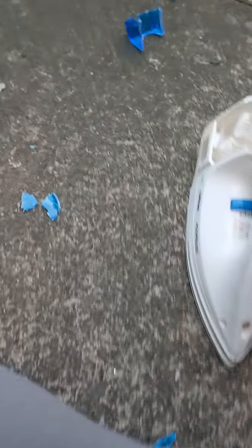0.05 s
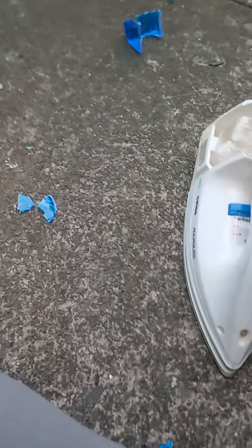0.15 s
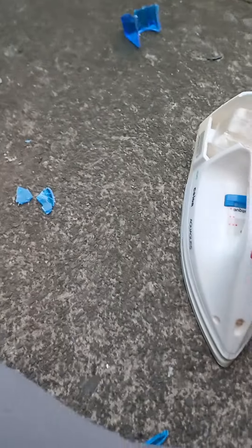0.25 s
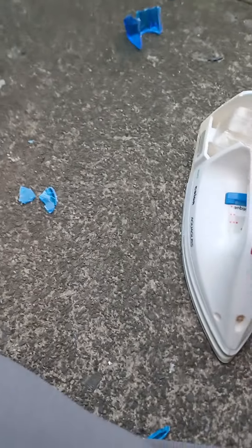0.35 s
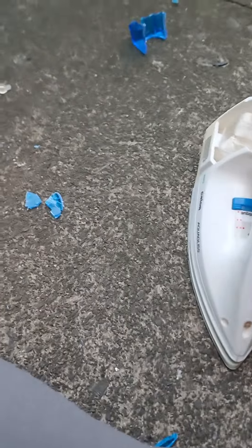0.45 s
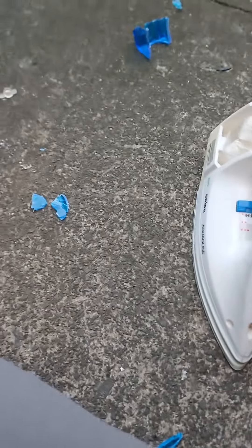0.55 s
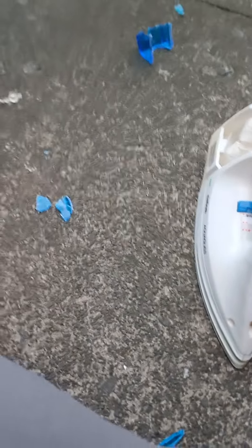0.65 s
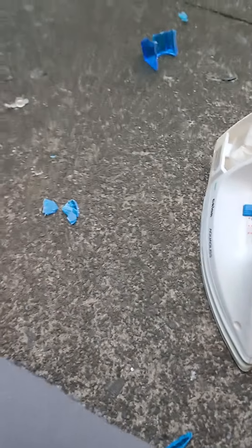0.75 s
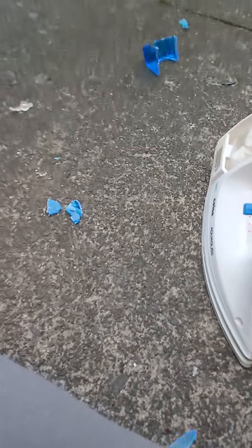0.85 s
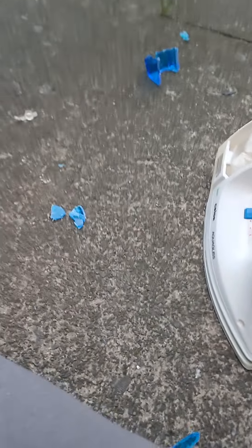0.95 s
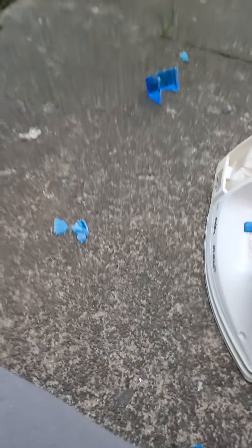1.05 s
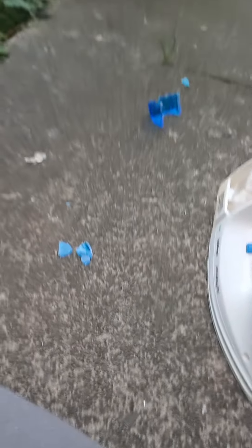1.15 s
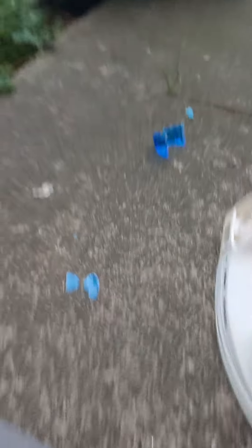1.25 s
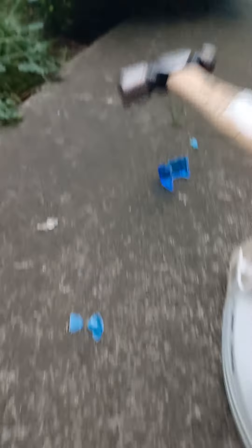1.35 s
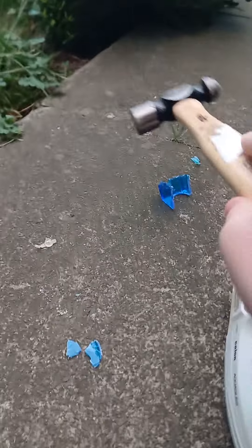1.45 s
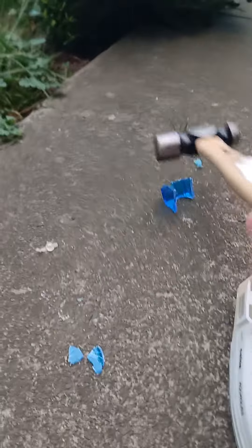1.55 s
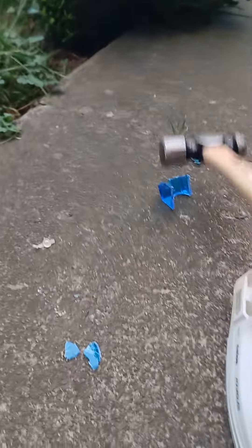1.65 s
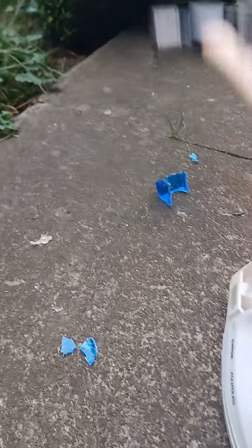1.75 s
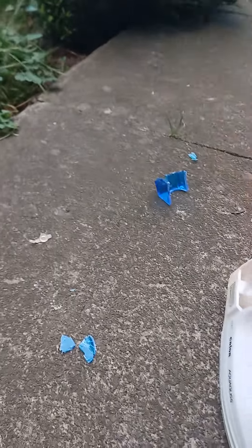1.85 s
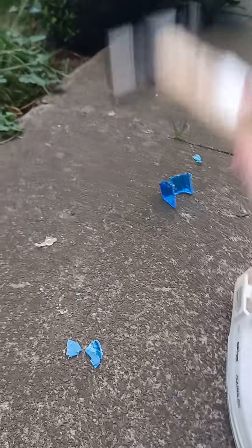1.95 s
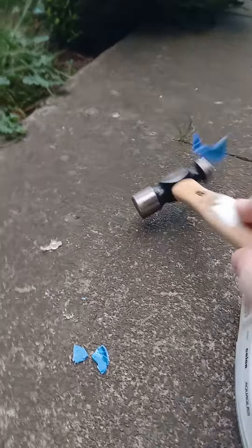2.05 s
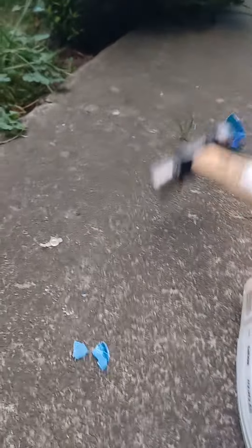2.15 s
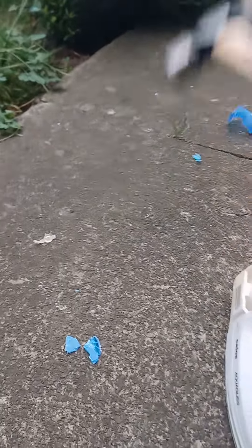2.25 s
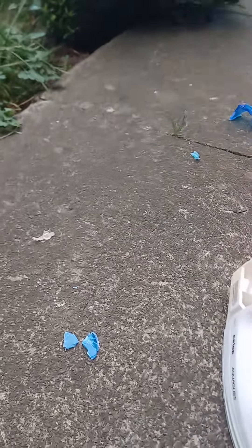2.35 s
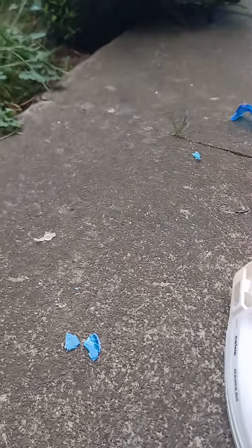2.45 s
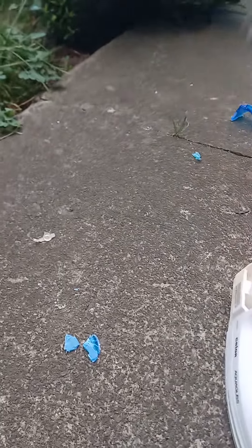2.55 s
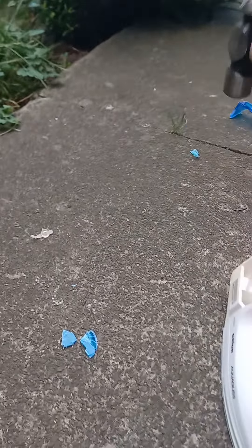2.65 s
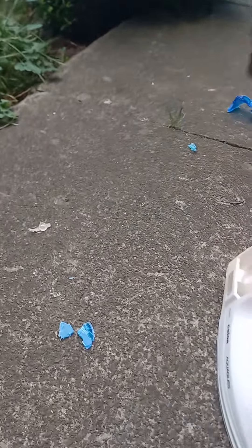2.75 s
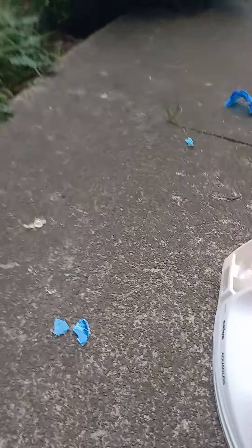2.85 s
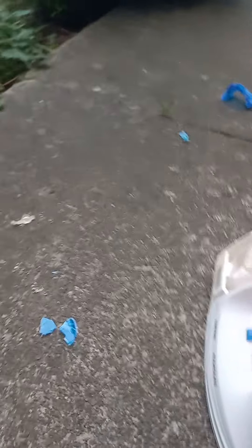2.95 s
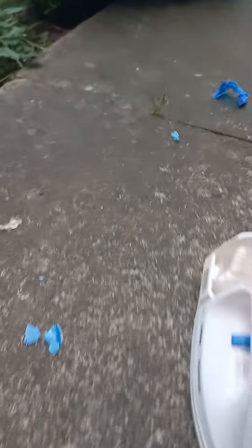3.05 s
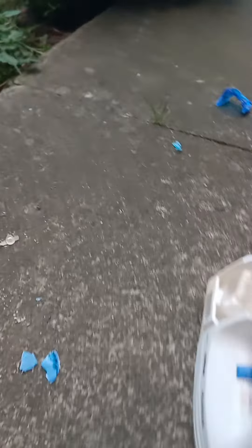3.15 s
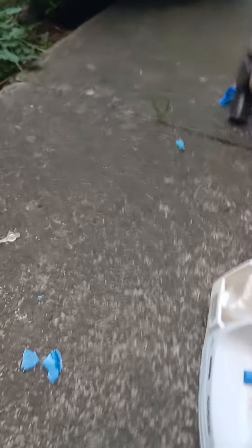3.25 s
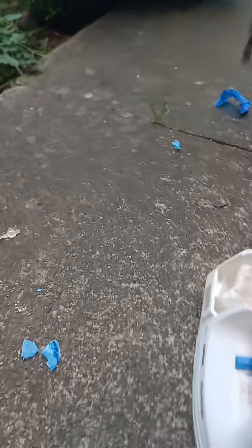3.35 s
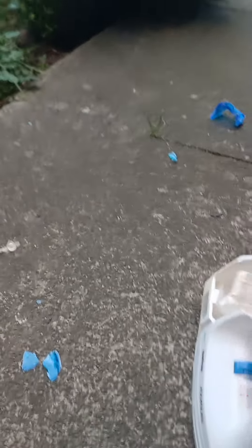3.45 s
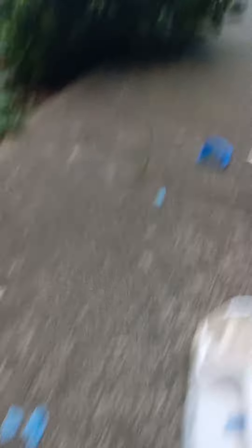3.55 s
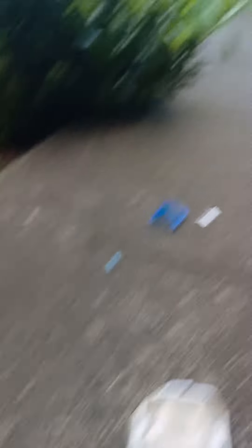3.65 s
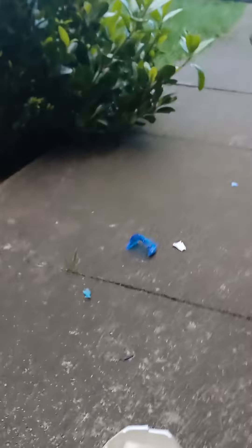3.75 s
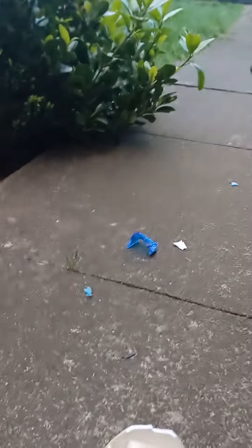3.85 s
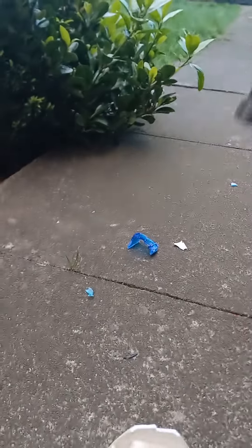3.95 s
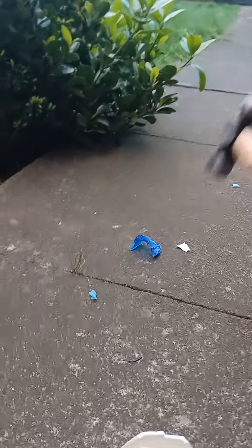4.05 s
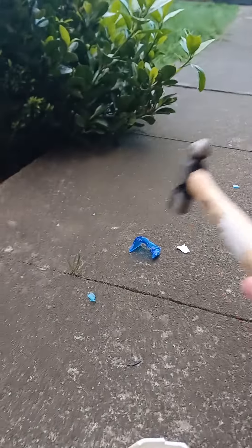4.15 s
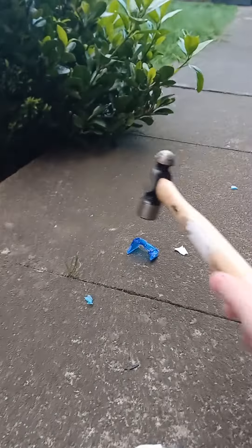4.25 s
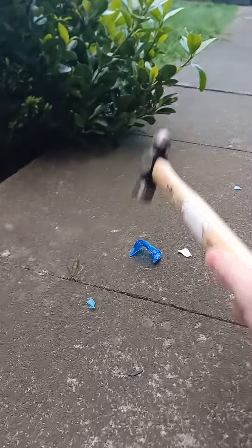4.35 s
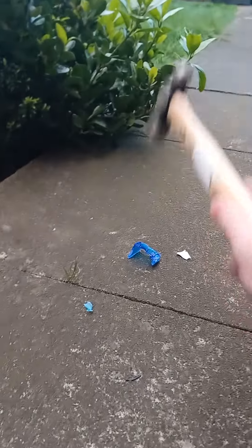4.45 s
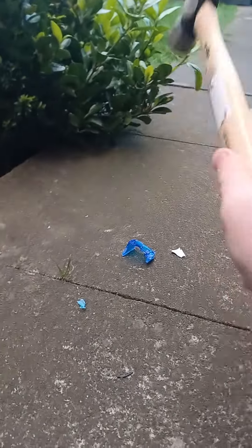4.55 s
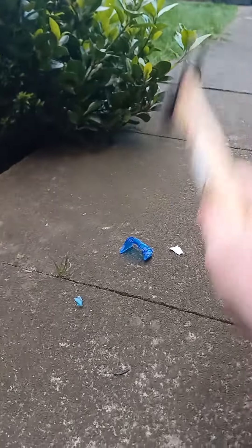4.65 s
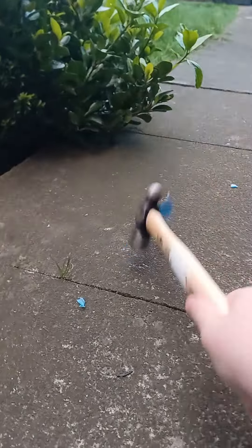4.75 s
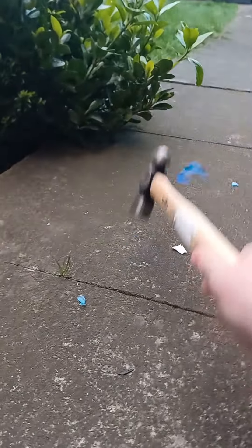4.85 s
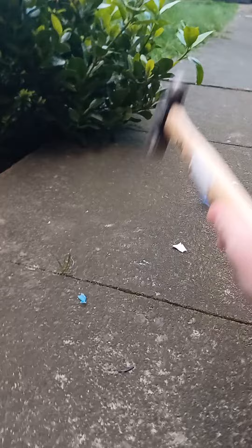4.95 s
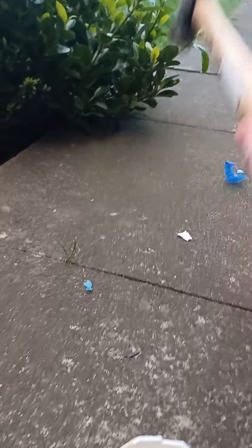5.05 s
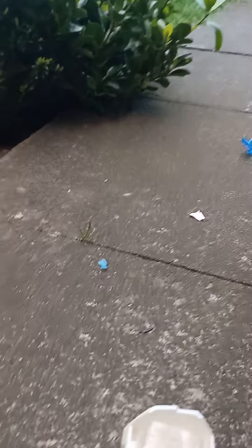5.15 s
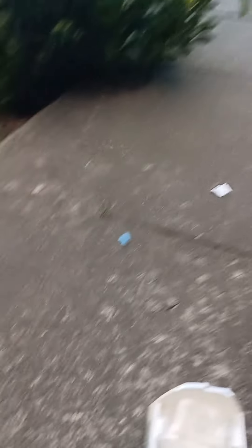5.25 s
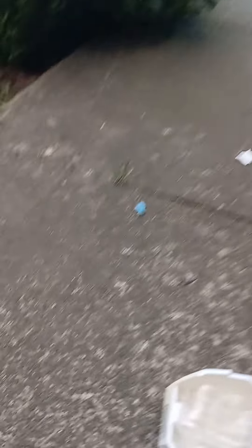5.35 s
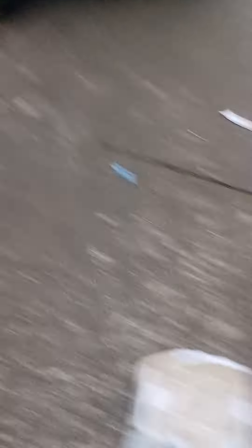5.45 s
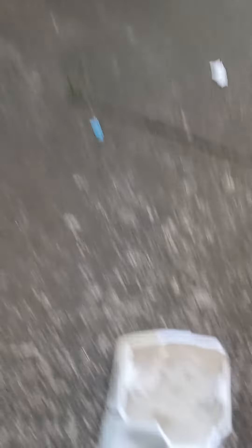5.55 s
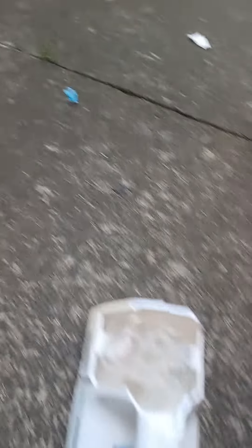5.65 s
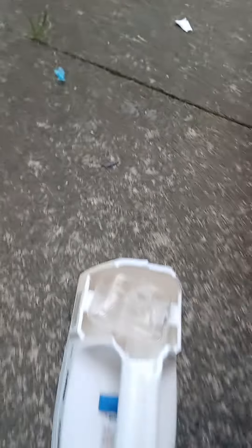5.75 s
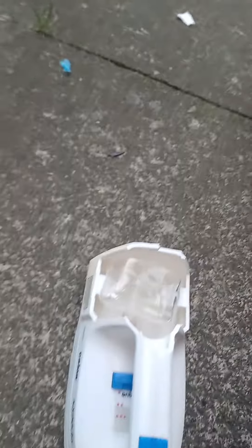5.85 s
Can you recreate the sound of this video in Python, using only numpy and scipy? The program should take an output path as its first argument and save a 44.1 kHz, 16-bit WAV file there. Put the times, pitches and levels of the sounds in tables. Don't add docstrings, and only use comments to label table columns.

```python
import sys
import numpy as np
from scipy import signal
from scipy.fft import rfft, irfft, next_fast_len
from scipy.io import wavfile
from scipy.ndimage import uniform_filter1d

SR = 44100
rng = np.random.default_rng(int(sys.argv[2]) if len(sys.argv) > 2 else 0)


def volts(x):
    e = np.asarray(x, float) / 20
    return 10 ** e


def bounce(signal):
    frames = np.transpose(np.atleast_2d(signal))
    limited = np.clip(frames, -1, 1)
    pcm = np.round(limited * 32767).astype(np.int16)
    wavfile.write(sys.argv[1], SR, pcm)


N = 260190

BASS_PAN_DB = -2.5
PORT_LAG_S = 0.0001922


def colour(x, points):
    hz, db = np.transpose(points)
    size = next_fast_len(x.shape[-1], True)
    f = np.maximum(np.fft.rfftfreq(size, 1 / SR), 1)
    gain = volts(np.interp(np.log(f), np.log(hz), db))
    return irfft(rfft(x, size) * gain, size)[..., :x.shape[-1]]


def unit(x):
    return x / np.sqrt(np.mean(x ** 2))


def curve(rows):
    s, *columns = np.transpose(rows)
    return [np.interp(np.arange(N) / SR, s, c) for c in columns]


def walk(rate, channels=1):
    k = int(SR / rate)
    steps = np.repeat(rng.standard_normal((channels, N // k + 1)), k, axis=1)
    smooth = uniform_filter1d(uniform_filter1d(steps, k), k)
    return unit(smooth[:, :N])


def add(out, x, s):
    i = int(s * SR)
    out[:, i:i + x.shape[1]] += x[:, :out.shape[1] - i]


def pan(db):
    return volts(np.array([[db / 2], [-db / 2]]))


def ring(hz, t60, rise_s, length_s, lag_s):
    t = np.maximum(np.arange(int(length_s * SR)) / SR - np.array([[0], [lag_s]]), 0)
    return -np.sin(2 * np.pi * hz * t) * (1 - np.exp(-t / rise_s)) * volts(-60 * t / t60)


# t/s, level/dB
ROAD = [(0.0, -53), (0.23, -50), (0.52, -56.5), (0.89, -55.5), (1.26, -53), (1.77, -48.5), (2.0, -47),
        (2.41, -48), (3.38, -42), (3.79, -48.5), (4.24, -50), (5.06, -47), (5.44, -48.5), (5.9, -42.5)]
# f/Hz, level/dB per Hz
TOWN = [(15, -54.5), (25, -37), (41, -14.5), (70, -5), (149, -8), (175, -15), (206, -10), (242, -8.5),
        (309, -13.5), (695, -16), (1100, -13.5), (2110, -30), (3340, -59.5), (7310, -63), (16000, -52)]
# t/s, f/Hz, level/dB
DRONE = [(.65, 111, -78), (.8, 110.2, -64), (1.186, 112.4, -48), (1.286, 116.8, -53.5), (1.472, 113.4, -46),
         (1.665, 112.3, -65.5), (1.768, 118.8, -46), (1.95, 113.9, -95)]


def traffic():
    calm_db, rumble_db, wash_db = -48, -47, -57
    wash_swing = 0.92
    busy_db = curve(ROAD)[0] - calm_db
    low_db = rumble_db + busy_db
    high_db = wash_db + wash_swing * busy_db
    out = 0
    for mid_hz in 30 * 2 ** np.arange(0, 9.2, .5):
        noise = rng.standard_normal((3, N))
        own = np.clip((mid_hz / 700) ** 0.77, .15, 1)
        mixed = np.sqrt(1 - own ** 2) * noise[0] + own * noise[1:]
        band = colour(mixed, [(mid_hz / 2, -40), (mid_hz, 0), (mid_hz * 2, -40)])
        drive_db = low_db if mid_hz < 470 else high_db + 4.0
        out = out + volts(drive_db + 0.58 * walk(4.63)) * band
    drone_hz, drone_db = curve(DRONE)
    engine = np.sin(2 * np.pi * np.cumsum(drone_hz) / SR)
    drone = np.sqrt(2) * volts(drone_db + 1.0 * walk(5.9)) * engine
    return pan(BASS_PAN_DB) * (volts(28.5) * colour(out, TOWN) + drone)


# t/s at full level, swell/s, hold/s, level/dB
MOVEMENTS = [(0., .05, .04, -77), (0.165, 0.07, 0.59, -74), (1.298, 0.13, 0.17, -70),
             (2.415, 0.87, 0.026, -78.5), (2.713, 0.17, 0.053, -65.5), (2.893, 0.3, 0.16, -81),
             (3.048, 0.13, 0.044, -68), (3.2, 0.08, .07, -86), (3.524, 0.016, 0.16, -64.5),
             (4.245, .4, 0.12, -84.5), (4.518, 0.27, .01, -79), (5.193, 0.48, 0.02, -72),
             (5.404, .05, 0.098, -77.5), (5.62, 0.33, .3, -75)]
# f/Hz, level/dB per Hz
CLOTH = [(880, -25), (1500, -2.5), (1790, -6.5), (2320, -8), (3480, -12.5), (4640, -11.5), (7100, -18),
         (9100, -27), (11500, -17), (16000, -20)]


def rustle():
    swell_db, settle_db_per_s = 22.5, 174
    t = np.arange(N) / SR
    level = 0
    for s, swell, hold, db in MOVEMENTS:
        before = np.maximum(s - t, 0)
        after = np.maximum(t - s - hold, 0)
        level = level + volts(db - swell_db * before / swell - settle_db_per_s * after)
    hiss = unit(colour(rng.standard_normal((2, N)), CLOTH))
    return level * volts(8.0 + 3.0 * walk(25, channels=2)) * pan(-4.5) * hiss


SPRAY_T60_S = 0.38

# t/s, length/s, level/dB, tilt/dB per octave, crumbs/dB
CRUNCHES = [
    (0.1517, 0.0084, -10.5, 4.5, -13),
    (2.0124, 0.004, -12, 7.5, -27.5),
    (3.264, 0.0044, -16, -6.5, -16),
    (4.7302, .007, -25, -1, -8),
    (5.412, .001, -26, 11, -30),
    (5.693, 0.0053, -11, 5.5, -20),
]


def crunch():
    crumb_db = -21
    ripple_db, clump_db = 3., 2.5
    out, t = np.zeros((2, N)), np.arange(SR // 2) / SR
    for s, length, db, tilt_db, spray_db in CRUNCHES:
        pan_db = max(5 + 1.1 * tilt_db, 0)
        noise = rng.standard_normal((3, len(t)))
        clicks = volts(0.83 * unit(uniform_filter1d(rng.standard_normal(len(t)), size=40)))
        clumps = volts(clump_db * unit(uniform_filter1d(noise[0], size=500)))
        ripple = np.transpose([np.geomspace(1500, 16000, num=110), ripple_db * noise[0, :110]])
        burst = np.minimum(t / .001, 1) * np.exp(-np.maximum(t - length, 0) / .0015)
        dust = volts(spray_db - 60 * t / SPRAY_T60_S) * np.minimum(t / length, 1) * clumps
        tone = [(100, -20), (500, 8.5 - 3.1 * tilt_db), (4000, 3),
                (9000, tilt_db - 5.0), (15000, 2 * tilt_db)]
        crackle = colour(.5 * noise[0] + noise[1:], tone)
        left, right = unit(colour(crackle, ripple)) * (burst + dust) * clicks
        right = colour(right, [(4500, 0.0061), (14000, -2 * pan_db)])
        add(out, volts(db) * np.array([left, right]), s)
        chips = crumbs(count=220, tilt_db=tilt_db)
        add(out, volts(db + spray_db + crumb_db) * pan(pan_db) * chips, s + length)
    return out


def crumbs(count, tilt_db):
    size_spread_db = 2.5
    out = np.zeros((2, SR // 2))
    for when, pitch, size, side in rng.random((count, 4)):
        hz, s = 2500 * 6.2 ** pitch, 0.27 * when ** 1.5
        size_db = -size_spread_db * np.log(1 - size)
        db = tilt_db * np.log2(hz / 4000) + size_db - 60 * s / SPRAY_T60_S
        chip = ring(hz, 0.028, 0.000071, .02, PORT_LAG_S * 2 * side)
        add(out, volts(db) * pan(14. * (side - .5)) * chip, s)
    return out


# t/s, contact/s, right port lag/s, bass left minus right/dB
BLOWS = [
    (0.1522, .0004, .0001, 6.5),
    (2.0142, .0008, .0001, -1.5),
    (3.26495, .00008, .0002, -3.),
    (4.7374, .0002, 0., -3.5),
    (5.6950, .0004, .0003, -2.),
    (5.7305, .0003, .0002, -3.),
]
# f/Hz, level/dB, t60/s
KNOCKS = [
    [(260, -13, 0.014), (430, -20, 0.023), (573, -17.5, .02), (1313, -24, 0.057), (3330, -17.5, 0.037),
     (4720, -25.5, 0.032), (6800, -20.5, 0.06)],
    [(326, -10, 0.025), (437.4, -9, 0.023), (677, -1.5, 0.014), (833, 4.5, 0.0079), (1246, -8, 0.013),
     (1510, -36, 0.0092)],
    [(160, -30, 0.026), (327, -8, 0.021), (820, -18.5, 0.046), (1302, -4.5, 0.026), (2230, -19, 0.015),
     (3280, -3.5, 0.0096), (5153, -14, 0.0066), (10930, -31.5, 0.086), (12800, -41, 0.065)],
    [(164.4, -32, 0.17), (394, -12.5, 0.039), (777, -3.5, 0.011), (1289, -3, 0.013), (1910, -12.5, 0.015),
     (4300, -1.5, 0.0027)],
    [(330, -29, 0.041), (582, -10.5, 0.006), (1420, -10.5, 0.0111)],
    [(407, -19.5, 0.02), (640, -26.5, 0.029), (1590, -25.5, 0.032), (2600, -44.5, 0.0091)],
]
# t/s, f/Hz, level/dB
TAPS = [
    (2.59, 858, -49.5),
    (4.33, 1020, -52),
    (4.39, 587, -51.5),
]
# t/s, level/dB
JOLTS = [
    (0.154, -30.5),
    (2.017, -27.5),
    (4.738, -36),
    (5.696, -34.5),
]


def hammer():
    out = np.zeros((2, N))
    for (s, contact, lag, bass_db), modes in zip(BLOWS, KNOCKS):
        for hz, db, t60 in modes:
            pan_db = bass_db if hz < 2500 else -.8
            add(out, volts(db) * pan(pan_db) * ring(hz, t60, contact, 0.27, lag), s)
    for s, hz, db in TAPS:
        add(out, volts(db) * pan(BASS_PAN_DB) * ring(hz, 0.39, 0.0091, .3, PORT_LAG_S), s)
    for s, db in JOLTS:
        add(out, volts(db) * pan(10.0) * ring(68, 0.21, 0.0066, 0.9, 0.0006), s)
    return out


# t/s, level/dB, top f/Hz
ECHOES = [
    (0.017, -12.5, 6880),
    (.039, -19, 2500),
]
# f/Hz, t60/s, level/dB
YARD = [(150, 0.48, -7.5), (442.2, 0.66, -12), (1000, 0.93, -35.5), (2500, 0.34, -18.5),
        (5960, 0.29, -11.5), (13000, 0.1, -17.5)]


def yard():
    round_trip_s = .01975
    t = np.arange(SR) / SR
    flutter = np.zeros((2, SR))
    rounds = np.arange(1, 40)
    returns = 0.39 ** rounds + volts(-11) * 0.857 ** rounds
    flutter[:, (rounds * round_trip_s * SR).astype(int)] = returns
    out = volts(-7.5) * colour(flutter, [(130, -17.5), (230, 8.5), (450, 2.5), (600, -23.5)])
    for s, db, top_hz in ECHOES:
        rough = rng.standard_normal((2, SR)) * np.exp(-np.abs(t - s) / 0.003)
        out += volts(db - 22.0) * colour(rough, [(200, -6), (800, 0), (top_hz, -4), (2 * top_hz, -20)])
    for hz, t60, db in YARD:
        noise = rng.standard_normal((3, SR))
        share = min(100 / hz, .4)
        mixed = share * noise[0] + np.sqrt(1 - share ** 2) * noise[1:]
        band = colour(mixed, [(hz / 3.9, -30), (hz, 0), (hz * 7.5, -30)])
        fade = np.clip((t - .006) / 0.027, 0, 1) * volts(-60 * t / t60)
        out += volts(db) * band * fade / np.sqrt(np.sum(fade ** 2))
    return out


def landing(s, tick_db, bright_db, until, modes, pan_db):
    tumble_hz, tumble_depth = 29.5, 0.087
    out, t = np.zeros((2, SR // 4)), np.arange(SR // 4) / SR
    for (hz, t60, db), z in zip(modes, rng.standard_normal((len(modes), 5))):
        side = pan(pan_db * min(hz / 10000, 1) + BASS_PAN_DB + 1.88 * z[0])
        depth = min(tumble_depth * hz / 4000, .8)
        tumble = 1 + depth * np.cos(2 * np.pi * tumble_hz * (1 + 0.18 * z[3]) * t + z[4])
        choke = np.exp(-np.maximum(t - (until - s), 0) * (hz / 1800.0) ** 2)
        lag_s = PORT_LAG_S * (0.262 + abs(z[2]) * (hz > 6000))
        note = ring(hz * (1 + 0.0011 * z[1]), t60, 0.00022, 1 / 4, lag_s)
        out += volts(db) * side * tumble * choke * note
    tone = [(800, 3), (3000, 10.5), (8000, bright_db / 2 + 8.5), (15000, bright_db + 4.0)]
    crack = unit(colour(rng.standard_normal(out.shape), tone))
    tick_and_rattle = np.exp(-t / 0.00018) + volts(-15.0) * np.exp(-t / 0.0058)
    return out + volts(tick_db) * pan(2.4) * crack * tick_and_rattle


# t/s, tick/dB, ring/dB, tilt/dB per octave, shimmer/dB
BOUNCES = [(2.175, -21.5, -48.5, 10, -6), (2.1804, -40, -40.5, 8, -15.5), (2.2354, -34.5, -54, 5.5, -19),
           (2.2772, -39.5, -67, 8.5, -16), (2.2955, -40, -55.5, -3, 7), (2.3077, -49, -65, 4.5, 3),
           (2.3598, -59, -61.5, -4, 8.5), (4.9822, -13.5, -45.5, 10.5, 3), (5.074, -28.5, -46, 5, -13),
           (5.0878, -23, -49, 7, 10.5), (5.1682, -29.5, -43.5, -6, 8.5), (5.1957, -38, -57, 0.5, 11),
           (5.3566, -68.5, -53.5, -7, -6), (5.4111, -55, -56.5, -5, 6), (5.436, -57, -51, 1.5, 0.5),
           (5.4999, -59, -55.5, -10, 5), (5.7544, -41, -38, -2, .5), (5.8157, -32.5, -40.5, 4, -5.5)]
# t/s, tick/dB, ring/dB, tilt/dB per octave, shimmer/dB
LAUNCHES = [
    (2.016, -60.5, -36, 2.6, -2.5),
    (4.73, -62, -52, 14, 11),
    (5.697, -71, -63, 11.5, 23),
]
# f/Hz, t60/s, level/dB
PIECE = [(1476, .35, 0), (3598, .12, 0), (5405, .08, 0), (2056, .12, -17), (8344, .08, -8), (9550, .08, -9),
         (10860, .095, -2), (12420, .065, -8), (13400, .07, -7), (14510, .05, -9)]
# t/s, tick/dB, ring/dB, low f/Hz, high f/Hz
SHARDS = [(0.3037, -32.5, -53, 4460, 12700), (0.3244, -36, -47, 5600, 11100),
          (0.3373, -29, -37, 10950, 13530), (0.3562, -28.5, -38, 5040, 11500),
          (0.3903, -36.5, -54, 4220, 13800), (0.4192, -32, -45, 7700, 13600),
          (0.4264, -33.5, -46, 1890, 15970), (0.467, -36.5, -50, 7660, 14700),
          (0.4857, -41, -43, 4554, 4760), (0.4988, -34.5, -44.5, 4360, 13500),
          (0.576, -35, -41, 13700, 15000), (0.8298, -61.5, -79, 2060, 12280),
          (0.869, -68, -76, 1820, 12450), (0.8944, -65, -86, 2050, 8720), (2.0514, -42, -48, 2060, 8750)]
# f/Hz, t60/s, level/dB
CHIP = [(3500, .1, -9), (4235, .09, -8), (4985, .09, -8), (6944, .06, -9), (7530, .07, -9),
        (9150, .045, -9), (11030, .07, -7), (12090, .05, -9), (13540, .06, -8), (14730, .045, -10),
        (15510, .045, -10)]


def pieces():
    scatter_db = 4.
    tilt_top_hz = 3600
    shard_high_db, shared_db = 1.5, -13.5
    out, rows = np.zeros((2, N)), sorted(BOUNCES + LAUNCHES)
    ends = [row[0] for row in rows[1:]] + [N / SR]
    for (s, tick_db, ring_db, tilt_db, shimmer_db), until in zip(rows, ends):
        modes = []
        for (hz, t60, db), luck in zip(PIECE, scatter_db * rng.standard_normal(len(PIECE))):
            mode_db = ring_db + db - 1.4 + tilt_db * np.log2(min(hz, tilt_top_hz) / PIECE[0][0])
            mode_db += shimmer_db * (hz > tilt_top_hz) + luck * (db < 0)
            modes.append((hz, t60, mode_db))
        add(out, landing(s, tick_db, 1.1 * shimmer_db - .1, until, modes, 4.5), s)
    ends = [row[0] for row in SHARDS[1:]] + [N / SR]
    for (s, tick_db, ring_db, low_hz, high_hz), until in zip(SHARDS, ends):
        modes = [(low_hz, .07, ring_db), (high_hz, .045, ring_db + shard_high_db)]
        for (hz, t60, db), luck in zip(CHIP, scatter_db * rng.standard_normal(len(CHIP))):
            modes.append((hz, t60, db + shared_db + tick_db + shard_high_db * (hz > 8000) + luck))
        add(out, landing(s, tick_db, 10.0, until, modes, 11.0), s)
    return out


def scene():
    blows = hammer() + crunch()
    clinks = pieces()
    wet = signal.fftconvolve(blows + volts(-5) * clinks, yard(), axes=1)[:, :N]
    return blows + clinks + wet + rustle() + traffic()


def roll_off(x):
    return signal.sosfilt(signal.butter(12, 17170, fs=SR, output="sos"), x)


# f/Hz, level/dB
PHONE_BAND = [(22, -14), (45, 0), (15700, 0), (15900, -15), (16900, -20), (17250, -100)]


def record(dry):
    rounded = np.tanh(dry / 1.428) * 1.644
    return roll_off(colour(rounded, PHONE_BAND))


dry = scene()
out = record(dry)
bounce(out)
```